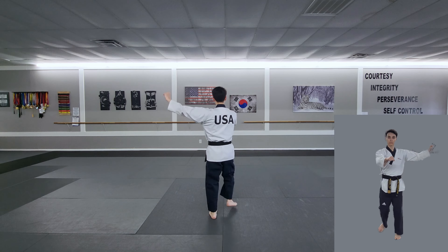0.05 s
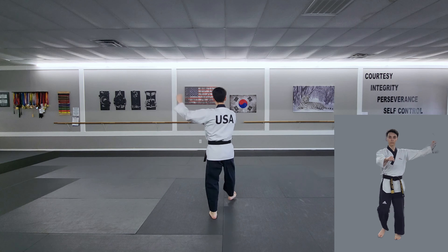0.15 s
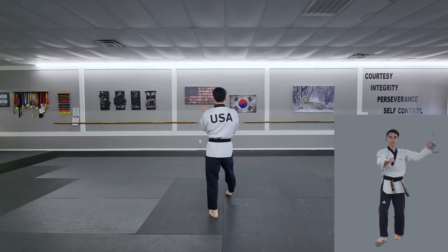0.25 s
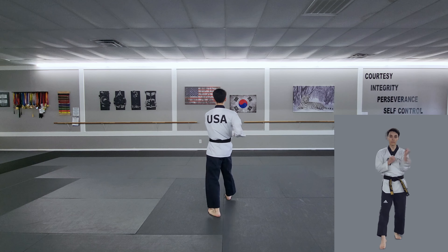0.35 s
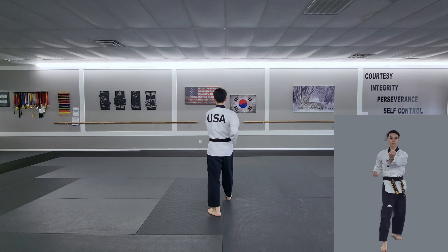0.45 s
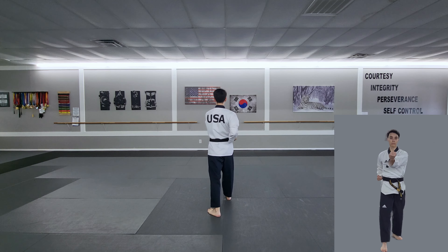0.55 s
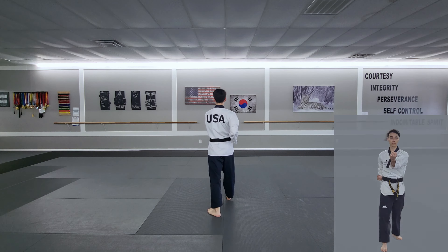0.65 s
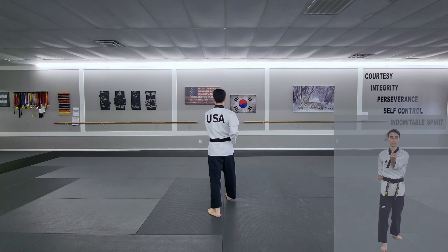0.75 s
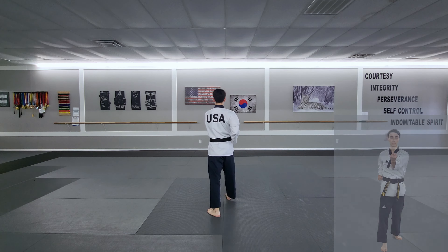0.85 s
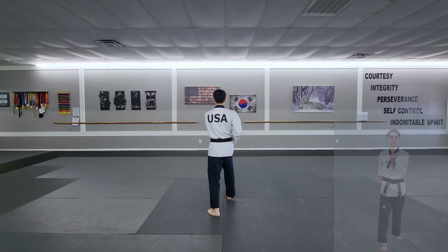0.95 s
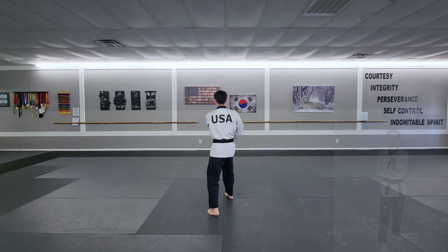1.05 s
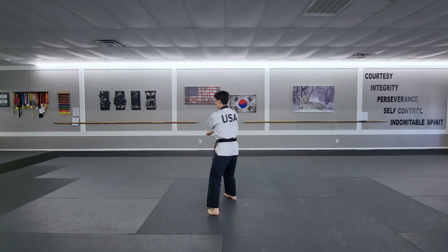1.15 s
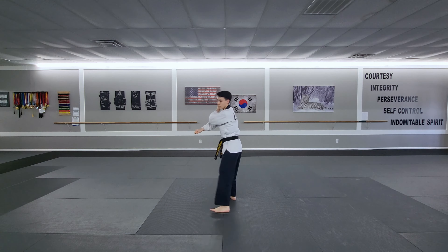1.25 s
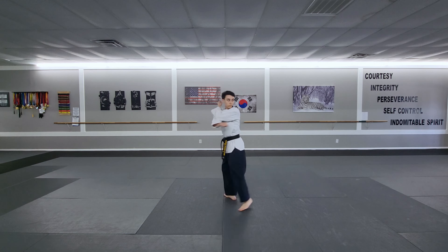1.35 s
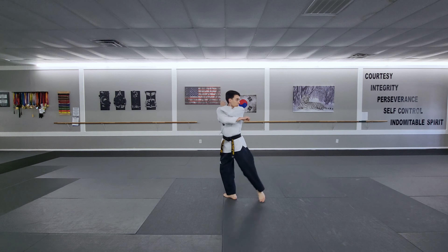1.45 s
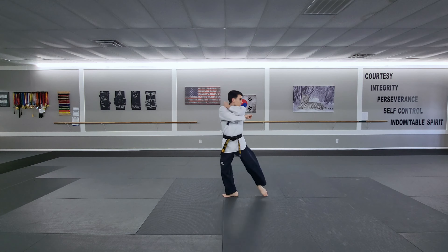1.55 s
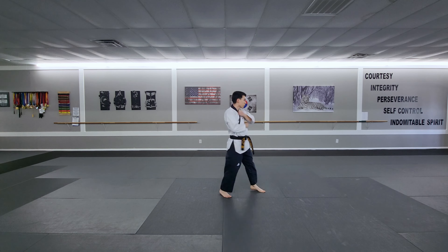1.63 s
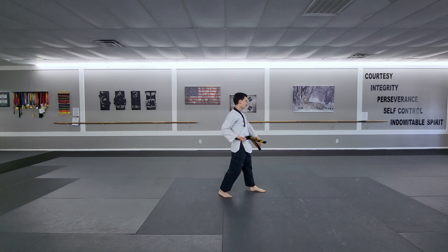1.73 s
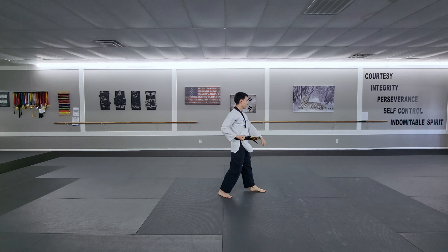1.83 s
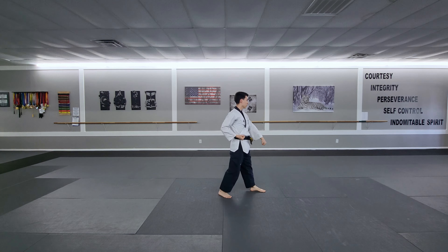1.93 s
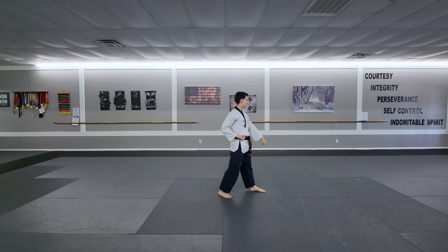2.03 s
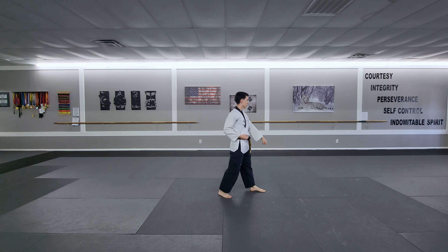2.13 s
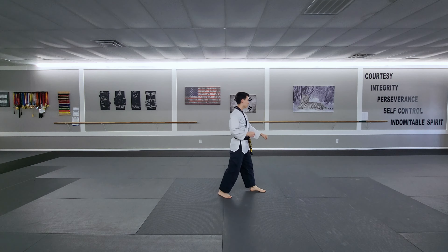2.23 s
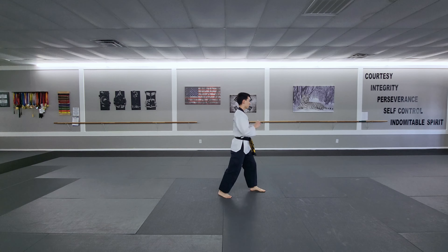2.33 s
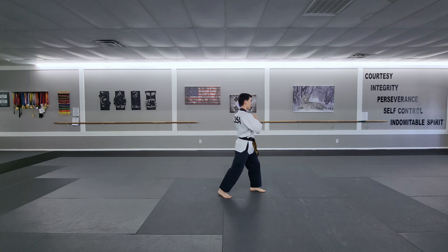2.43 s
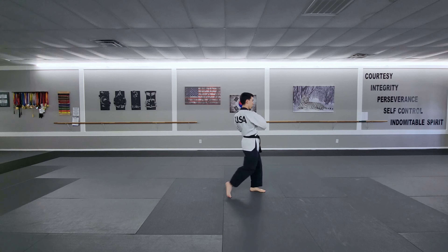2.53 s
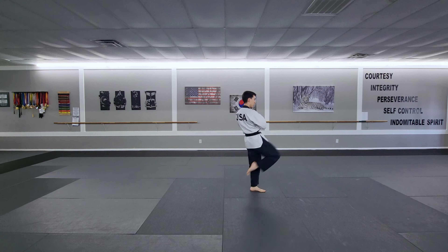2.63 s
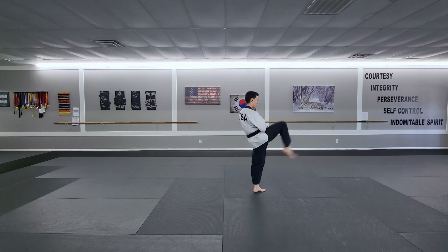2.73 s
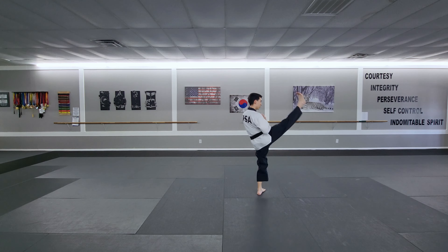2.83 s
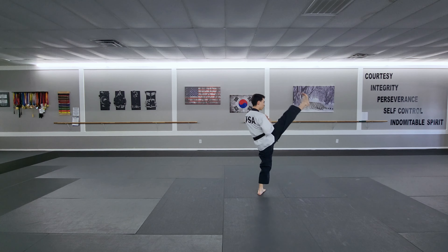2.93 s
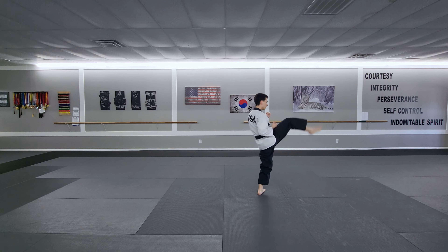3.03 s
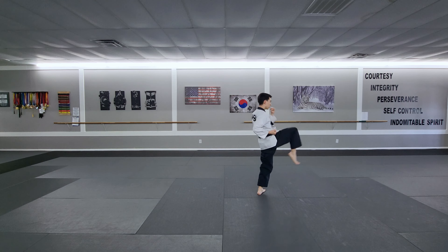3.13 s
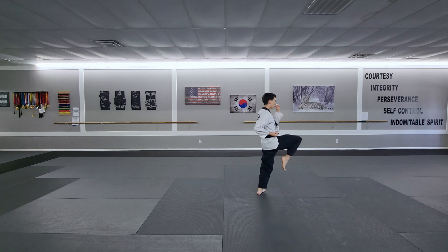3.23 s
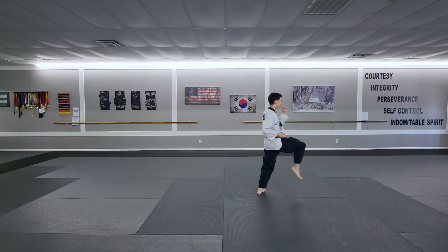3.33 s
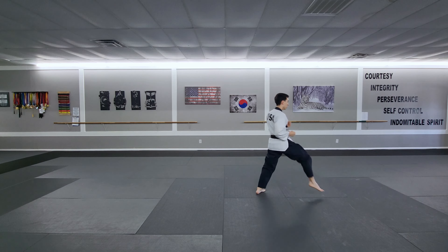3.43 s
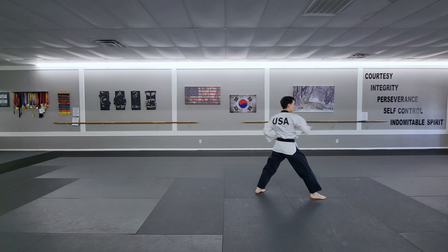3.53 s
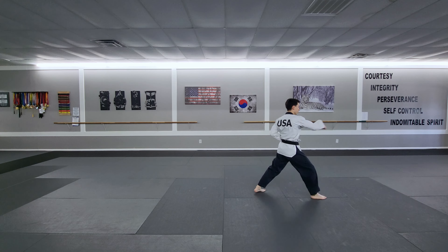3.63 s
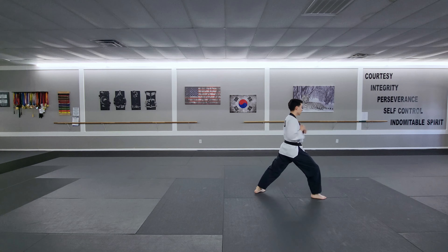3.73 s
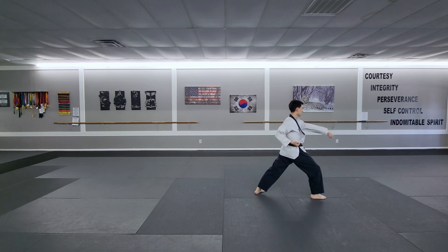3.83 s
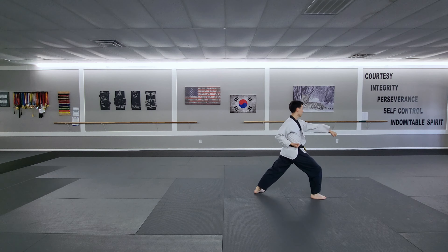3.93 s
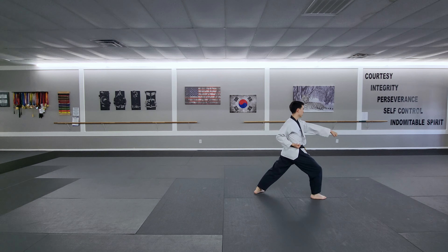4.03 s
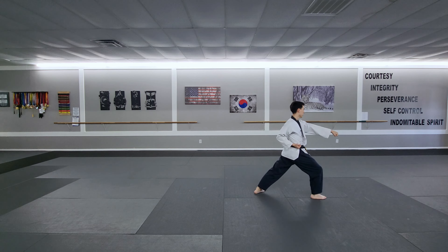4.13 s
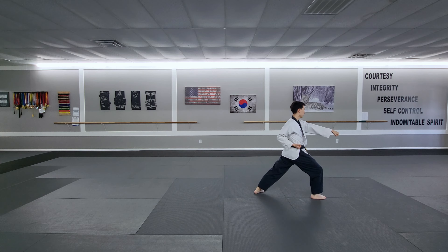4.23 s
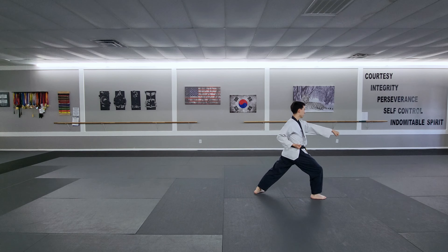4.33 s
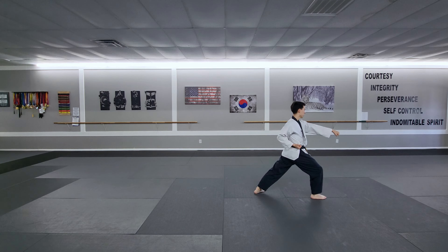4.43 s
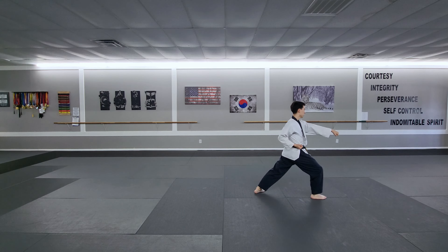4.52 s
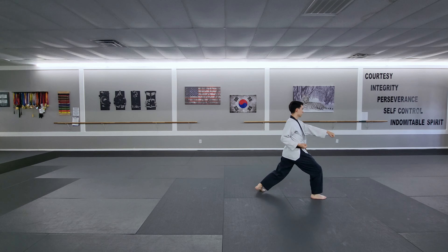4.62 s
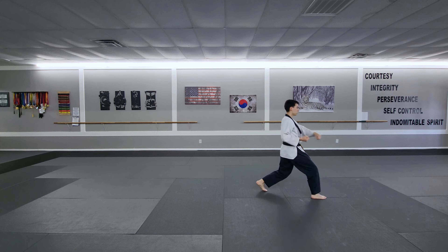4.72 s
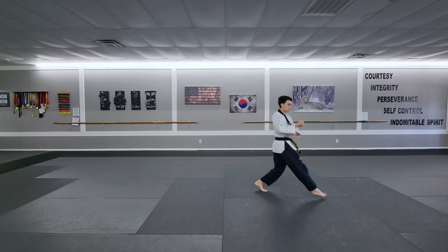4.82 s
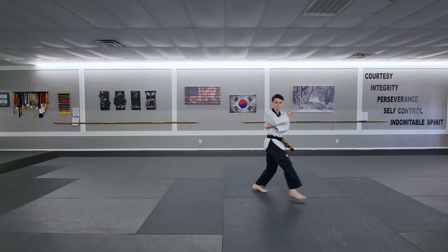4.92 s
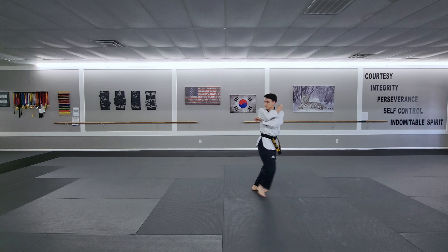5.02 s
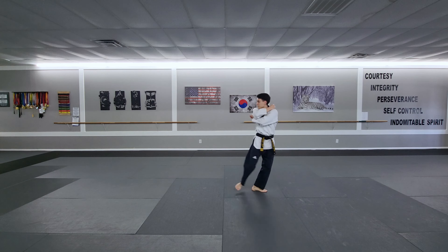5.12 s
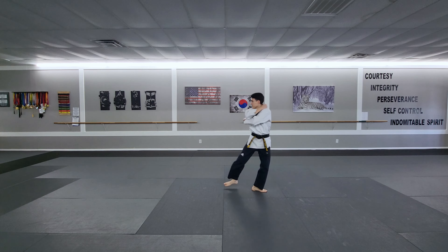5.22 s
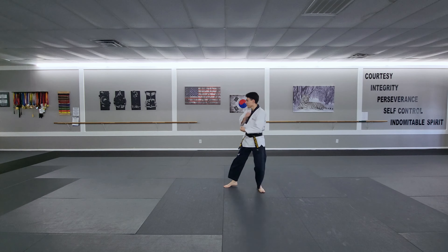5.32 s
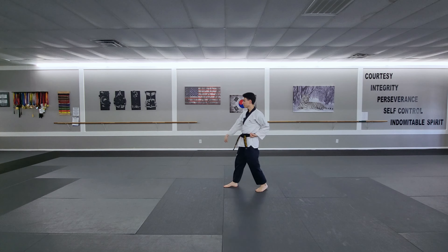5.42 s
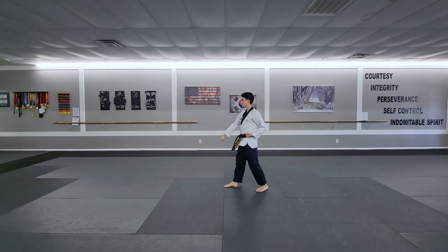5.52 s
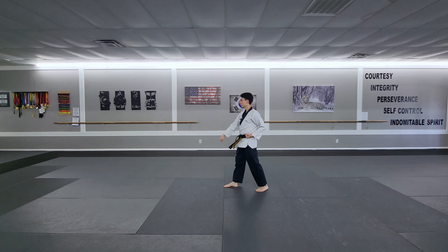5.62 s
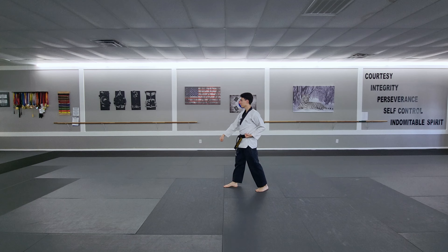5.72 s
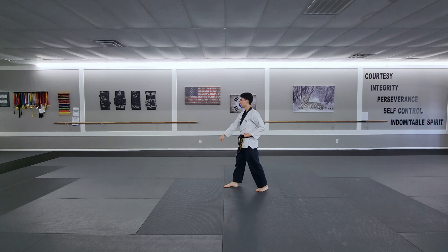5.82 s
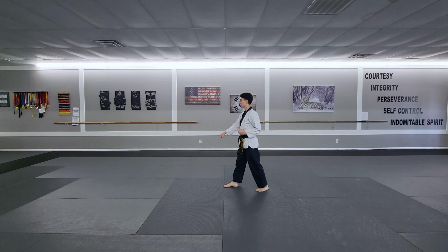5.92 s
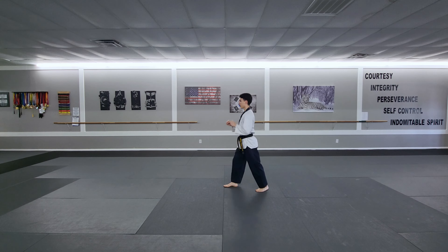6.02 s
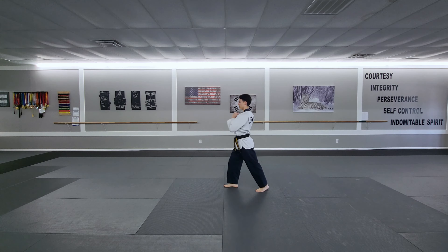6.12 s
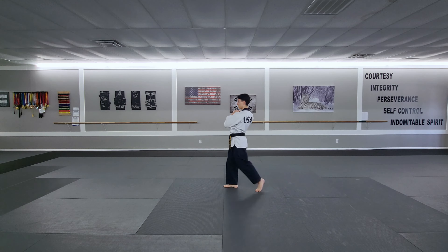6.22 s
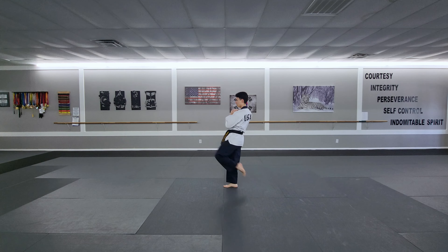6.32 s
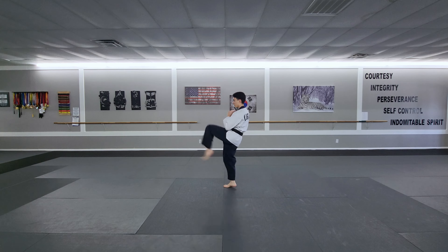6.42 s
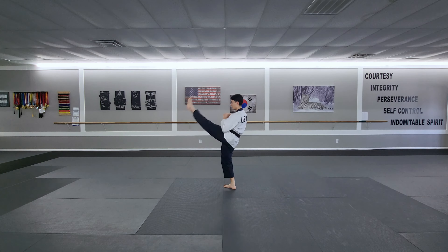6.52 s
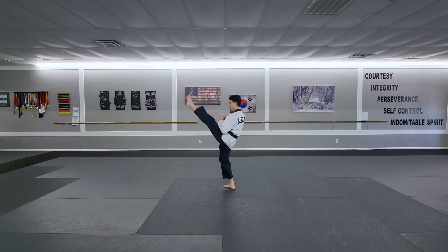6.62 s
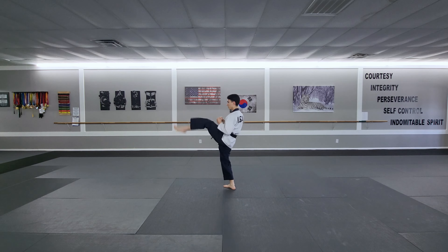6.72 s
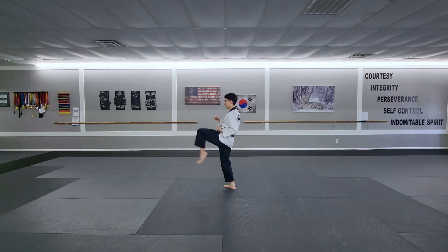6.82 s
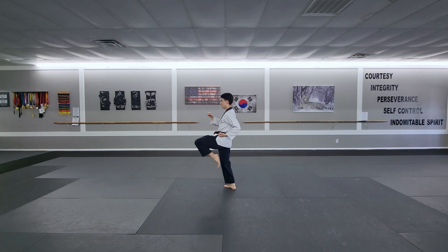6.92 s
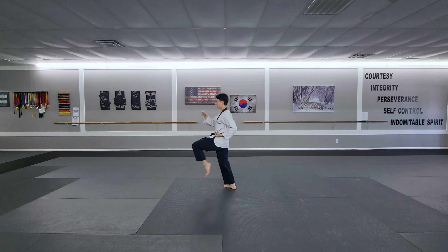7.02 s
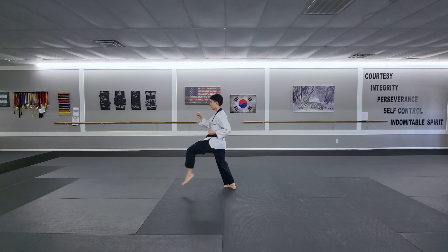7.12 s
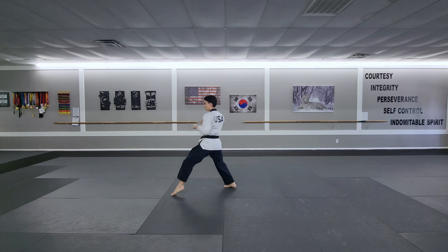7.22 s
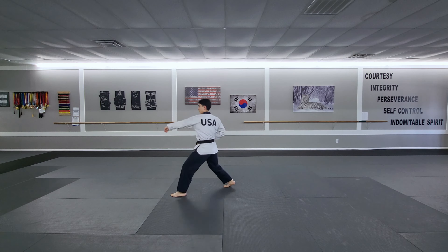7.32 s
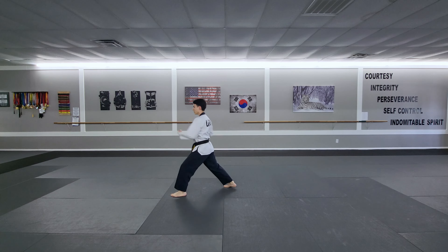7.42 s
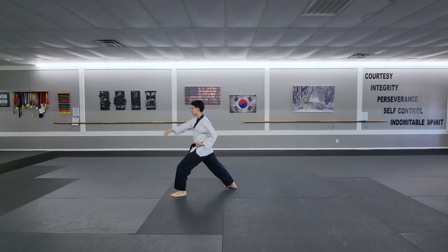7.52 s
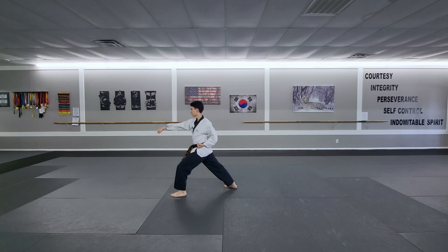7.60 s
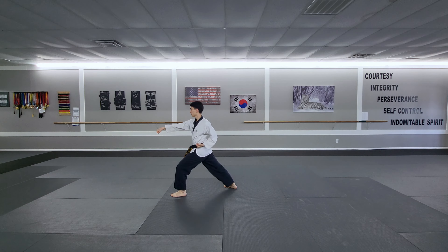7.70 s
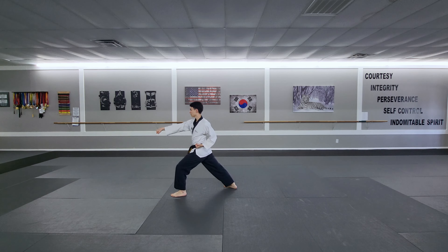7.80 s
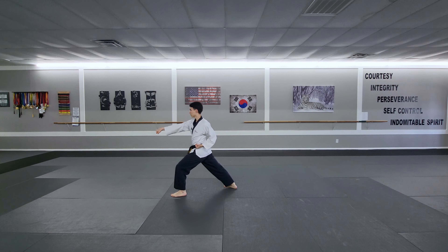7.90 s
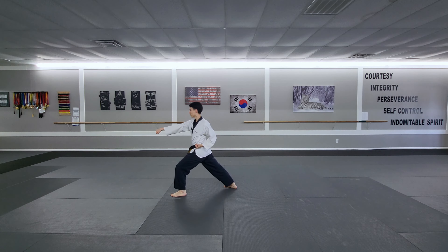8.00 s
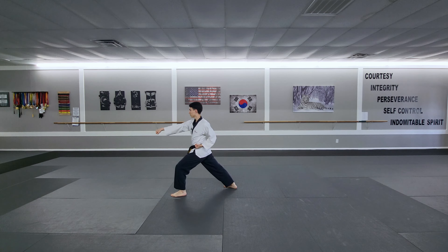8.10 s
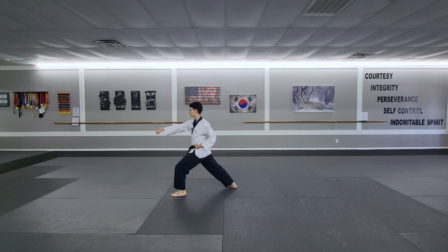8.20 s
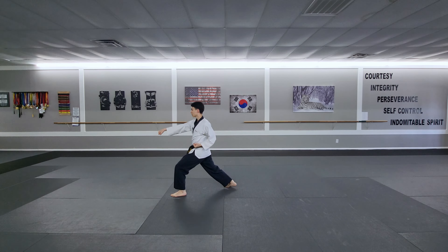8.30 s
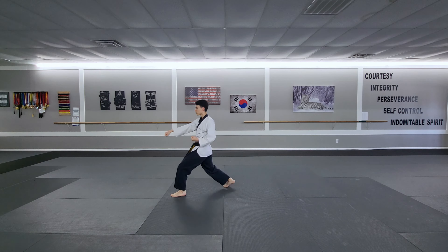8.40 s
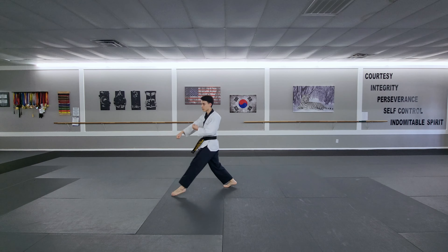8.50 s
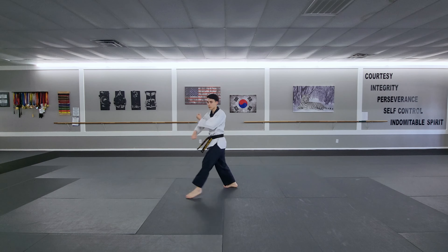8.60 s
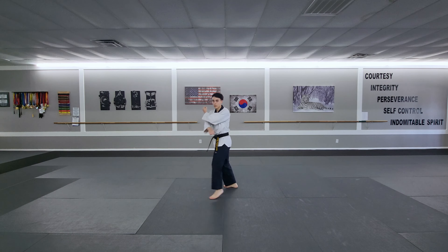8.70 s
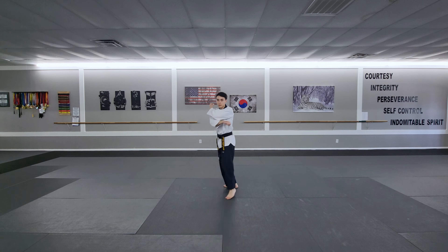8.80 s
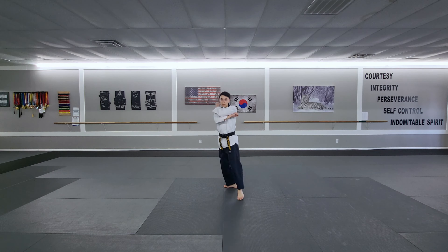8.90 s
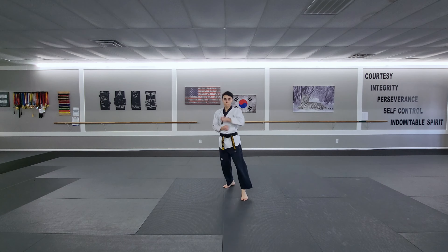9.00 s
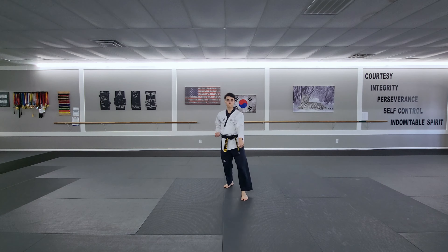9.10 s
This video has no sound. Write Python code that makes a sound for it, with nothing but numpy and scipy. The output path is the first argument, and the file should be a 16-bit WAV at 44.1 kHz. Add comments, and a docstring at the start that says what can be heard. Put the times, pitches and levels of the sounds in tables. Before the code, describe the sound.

In a low, lightly echoing training hall, a martial artist's loose uniform rustles, swishes and cracks taut with each block, kick and punch. Bare soles land in hollow pats and briefly hiss across foam mats. Two bursts of action, around a kick and landing each, are separated by quiet holds. Muffled road rumble and a climbing engine sit underneath, heard by a stereo microphone a few metres off.

```python
"""A loose uniform rustles, swishes and snaps taut as a martial artist kicks, blocks and punches in a low hall.
The cloth is made of random grains shaped by limb speed; its snaps are short noise bursts.
Bare soles pat the foam mats in filtered bursts and slide over them in filtered grains.
The hall answers with decaying diffuse noise. Traffic drones through the walls as filtered noise and
wavering sines, one engine pulls through two gears, and a thin whine and microphone hiss lie behind."""
import sys
import numpy as np
from scipy import signal
from scipy.fft import rfft, irfft, next_fast_len
from scipy.io import wavfile
from scipy.ndimage import map_coordinates

SR = 44100
rng = np.random.default_rng(int(sys.argv[2]) if len(sys.argv) > 2 else 0)


def to_wav(s):
    """Save 16-bit WAV."""
    ch = np.atleast_2d(s).T  # columns
    pcm = np.round(np.clip(ch, -1, 1) * 32767)  # PCM
    wavfile.write(sys.argv[1], SR, pcm.astype(np.int16))


N = 403515


def amp(db):
    """Decibels to gain."""
    return 10 ** (np.asarray(db) / 20)


def unit(x):
    """Scale to rms 1."""
    return x / np.sqrt(np.mean(x ** 2) + 1e-20)


def clock():
    """Time of each sample in seconds."""
    return np.arange(N) / SR


def along(points, hz):
    """Read (Hz, value) points on a log frequency axis."""
    f, v = np.transpose(points)
    return np.interp(np.log(hz + 1), np.log(f + 1), v)


def curves(rows):
    """One value per sample for each column after the time."""
    s, *cols = np.transpose(rows)
    return [np.interp(clock(), s, c) for c in cols]


def wobble(rate):
    """A smooth random curve with this many knots a second."""
    knots = rng.standard_normal(int(N * rate / SR) + 4)
    return map_coordinates(knots, [clock() * rate])


def tone(hz):
    """A sine that follows a pitch curve."""
    return np.sin(2 * np.pi * np.cumsum(hz) / SR)


def filtered(x, response):
    """Multiply the spectrum of x by a response of frequency."""
    m = next_fast_len(x.shape[-1] + SR // 4)
    spectrum = rfft(x, m) * response(np.fft.rfftfreq(m, 1 / SR))
    return irfft(spectrum, m)[..., :x.shape[-1]]


def coloured(x, spectrum, size=2048):
    """Pass x through a causal (minimum-phase) body of unit energy with this spectrum."""
    cepstrum = irfft(np.log(amp(along(spectrum, np.fft.rfftfreq(size, 1 / SR)))))
    # fold the cepstrum forward in time
    cepstrum[1:size // 2] *= 2
    cepstrum[size // 2 + 1:] = 0
    body = irfft(np.exp(rfft(cepstrum)))
    return signal.fftconvolve(x, body / np.linalg.norm(body))[:N]


def grains(rate, spread_db):
    """Tiny random impulses of uneven size, about rate of them a second, rms 1."""
    present = rng.random(N) < rate / SR
    sign = rng.choice([-1, 1], N)
    size = amp(spread_db * np.clip(rng.standard_normal(N), -2, 2))
    return unit(present * sign * size)


def blows(times, levels_db, t60, scatter, lead=.001):
    """Each blow builds up over lead seconds to one push and a dying scatter; its level is the rms over 10 ms."""
    half = SR // 8
    out, t = np.zeros(N + SR), np.arange(-half, half) / SR
    for s, db in zip(times, levels_db):
        envelope = amp(-60 * np.where(t < 0, -t / lead, t / t60))
        burst = rng.standard_normal(len(t)) * envelope
        burst *= scatter / np.linalg.norm(burst)
        burst[half] = 1  # the push itself
        burst *= np.sqrt(SR / 100) / np.linalg.norm(burst)
        out[round(s * SR):][:len(t)] += amp(db) * burst
    return out[half:][:N]


# How wide the diffuse sound is. Each row: frequency in Hz, side against mid in dB.
SIDE_WIDTH = [(60, -20.5), (280, -11), (500, -8.5), (1000, -1), (2000, -3), (4000, -1), (15000, 1)]


def diffuse(size):
    """Noise from all sides: the two close microphones share the bass but not the treble."""
    mid, side = rng.standard_normal((2, size))
    side = filtered(side, lambda hz: amp(along(SIDE_WIDTH, hz)))
    pair = np.array([mid + side, mid - side])
    return filtered(pair, lambda hz: 1 / np.hypot(1, amp(along(SIDE_WIDTH, hz))))


# Techniques that softly stir the whole uniform, most at their middle.
# Each row: start in seconds, end in seconds, relative flutter level in dB.
SOFT_MOVES = [(-.3, 0.885, -77), (0.868, 1.364, -70), (1.3, 2.24, -73), (2.11, 3.456, -66),
              (3.318, 4.054, -59), (4.476, 5.403, -70), (5.745, 7.115, -64.5), (7.069, 7.75, -59.5),
              (8.23, 9.396, -68)]
# An arm or leg sweeping through the air. Each row: time of top speed in seconds,
# half length in seconds, relative flutter level in dB, relative rub level in dB.
LIMB_SWISHES = [(0.237, 0.047, -59, -89), (0.306, 0.035, -38, -48), (1.223, .014, -52, -56.5),
                (1.52, 0.16, -54, -78), (1.71, 0.041, -45, -48.5), (1.895, 0.012, -61, -59),
                (2.677, 0.1, -51, -71.5), (2.829, 0.12, -52, -57.5), (3.072, 0.092, -61.5, -73),
                (3.582, 0.081, -49.5, -61), (3.786, 0.037, -46, -55), (4.568, 0.017, -78, -64),
                (4.819, 0.071, -69, -62), (5.349, 0.063, -45, -52), (6.031, .012, -64, -65),
                (6.113, 0.029, -58.5, -64), (6.41, 0.11, -52, -62.5), (6.76, 0.094, -64, -85),
                (7.339, 0.023, -36.5, -67), (7.486, 0.033, -42.5, -52), (8.42, 0.044, -75, -70.5),
                (8.538, 0.039, -60, -66), (9.022, 0.037, -42.5, -46.5)]
# Cloth pulled taut, flapping around the snap; the row at 6.236 s is the rear foot leaving the mat, played the
# same way. Each row: time in seconds, relative levels in dB of the crack, the crisp edge and the flap.
CLOTH_SNAPS = [(.275, -38, -49, -48), (.292, -32, -56, -40), (2.8435, -26.5, -55, -42),
               (2.869, -38, -59, -41), (3.641, -37, -54, -31), (3.857, -42, -62, -41),
               (4.372, -80, -78, -80), (4.889, -51, -73, -55), (5.46, -44, -68, -40),
               (6.236, -45, -60, -54), (6.5145, -31.5, -70, -46), (6.527, -45, -49, -44),
               (7.338, -39, -45, -41), (7.429, -41, -62, -43), (7.57, -39, -57, -35)]
# Colour of the flapping folds. Each row: frequency in Hz, relative level in dB per Hz.
FLUTTER_COLOUR = [(50, 3.5), (130, -17), (260, 3.5), (480, -5.5), (900, -6), (1250, -14), (1800, -15.5),
                  (3000, -23.5), (6000, -36.5), (16000, -72)]
# Colour of the rubbing weave, and of a snap's edge. Each row: frequency in Hz, relative level in dB per Hz.
RUB_COLOUR = [(400, -45), (1200, 7.5), (2000, 5), (3200, 6.5), (5500, 7), (8000, 2.5), (12000, -6.5),
              (16000, -10)]
MOVE_RUB_DB, MOVE_ARCH = -3.5, 1.36  # rub against flutter in soft moves; how pointed their swell is
FLAP_RISE_S, FLAP_DECAY_S, FLAP_RUB_DB = 0.0075, 0.02, -23.5  # flapping around a snap; its rub against flutter


def uniform():
    """Loose folds flap in dull little pops while the weave rubs in fine grains; both swell with limb speed."""
    t = clock()
    swells = []  # (shape, flutter dB, rub dB)
    for start, end, db in SOFT_MOVES:
        progress = np.clip((t - start) / (end - start), 0, 1)
        arch = np.abs(np.sin(np.pi * progress)) ** MOVE_ARCH
        swells.append((arch, db, db + MOVE_RUB_DB))
    for s, half, flutter_db, rub_db in LIMB_SWISHES:
        speed = np.exp2(-((t - s) / half) ** 2)
        swells.append((speed, flutter_db, rub_db))
    for s, _, _, flap_db in CLOTH_SNAPS:
        flapping = np.exp(-np.abs(t - s) / np.where(t < s, FLAP_RISE_S, FLAP_DECAY_S))
        swells.append((flapping, flap_db, flap_db + FLAP_RUB_DB))
    flutter_power = sum((amp(db) * shape) ** 2 for shape, db, _ in swells)
    rub_power = sum((amp(db) * shape) ** 2 for shape, _, db in swells)
    folds = wobble(110)  # folds catch and let go
    flutter = np.sqrt(flutter_power) * unit(amp(4.8 * folds) * grains(rate=1500, spread_db=3))
    rub = np.sqrt(rub_power) * unit(amp(3.3 * folds) * grains(rate=11000, spread_db=5.5))
    return coloured(flutter, FLUTTER_COLOUR) + coloured(rub, RUB_COLOUR)


# Dull colour of the crack of taut cloth. Each row: frequency in Hz, relative level in dB per Hz.
TAUT_COLOUR = [(50, -9.5), (130, -12.5), (270, 11.5), (460, -9), (640, -5), (950, -2), (1300, -8.5),
               (1900, -17.5), (3000, -24.5), (6000, -29.5), (16000, -64)]


def snaps():
    """A sleeve or trouser leg whips taut: a quick flurry of folds, a dull crack and a crisp edge."""
    s, crack_db, edge_db, _ = np.transpose(CLOTH_SNAPS)
    crack = blows(s, crack_db, t60=.045, scatter=1, lead=.025)
    edge = blows(s, edge_db, t60=0.048, scatter=7.4, lead=.02)
    return coloured(crack, TAUT_COLOUR) + coloured(edge, RUB_COLOUR)


# Bare feet meeting the mats. Each row: time in seconds, relative pat level in dB, relative skin slap level in dB.
FOOTFALLS = [(0.971, -54.5, -68), (1.342, -46, -72), (2.437, -70, -63), (2.553, -48, -70),
             (2.572, -56, -50), (3.516, -35.5, -44), (3.564, -37, -44), (4.779, -41, -68),
             (5.276, -41, -62), (7.238, -35, -48), (7.288, -32.5, -44), (8.217, -74, -73),
             (8.456, -52, -74), (8.517, -48, -51), (8.974, -45, -65)]
# Hollow colour of the foam. Each row: frequency in Hz, relative level in dB per Hz.
PAT_COLOUR = [(40, -29.5), (90, -6), (180, 6.5), (350, -10), (520, 11), (700, -22), (1050, -32.5),
              (1700, -21), (3000, -35.5), (16000, -34)]
# Bright colour of the slapping skin. Each row: frequency in Hz, relative level in dB per Hz.
SKIN_COLOUR = [(400, -13), (1100, 4.5), (1800, 4.5), (3200, 0.5), (5500, 3.5), (8000, -1), (12000, -14),
               (16000, -12)]
ROLL_S, ROLL_DB = .0045, -8.5  # the rest of the sole slaps down: delay and level after the first touch


def steps():
    """The foam gives a low, hollow pat; the skin adds a brief bright slap, doubled as the sole rolls down."""
    s, pat_db, slap_db = np.transpose(FOOTFALLS)
    pat = blows(s, pat_db, t60=.08, scatter=1.3, lead=.008)
    slap_times = np.r_[s, s + ROLL_S]
    slap_levels_db = np.r_[slap_db, slap_db + ROLL_DB]
    slap = blows(slap_times, slap_levels_db, t60=.012, scatter=2.5, lead=.003)
    return coloured(pat, PAT_COLOUR) + coloured(slap, SKIN_COLOUR)


# Soles dragged across the mats. Each row: start in seconds, end in seconds,
# relative level in dB, hollow share of the power from 0 to 1.
SOLE_SLIDES = [(1.355, 1.572, -48, 0.08), (1.575, 1.685, -55, 0.12), (5.287, 5.345, -55, 0.3),
               (5.367, 5.4, -50.5, 0.02), (8.649, 8.857, -60.5, .75), (8.696, 8.787, -65, 0.7),
               (8.962, 8.994, -53, 0.2)]
# Hissing colour of a sole. Each row: frequency in Hz, relative level in dB per Hz.
SOLE_COLOUR = [(150, -26), (300, -14.5), (520, 10), (1050, -21), (1700, 5.5), (2300, 1.5), (3100, 4),
               (3800, 5), (4800, 7.5), (8000, -0.5), (16000, -12.5)]
# Hollower colour, for a lightly loaded foot. Each row: frequency in Hz, relative level in dB per Hz.
HOLLOW_COLOUR = [(150, -15), (500, 15.5), (750, -19), (1080, -21), (1680, 3.5), (2050, -2), (2800, -2.5),
                 (3150, 6.5), (3600, -6.5), (7800, -5.5), (16000, -11)]


def slides():
    """A sole hisses over the textured mat, catching slightly as it goes; a lightly loaded foot sounds hollower."""
    t, ease_s = clock(), .014
    hiss, hollow = np.zeros((2, N))
    for start, end, db, share in SOLE_SLIDES:
        stroke = amp(db) * (np.tanh((t - start) / ease_s) - np.tanh((t - end) / ease_s)) / 2
        hiss += stroke * np.sqrt(1 - share)
        hollow += stroke * np.sqrt(share)
    catch = amp(2.3 * wobble(70))
    hiss *= catch * grains(rate=9000, spread_db=3)
    hollow *= catch * grains(rate=9000, spread_db=3)
    return coloured(hiss, SOLE_COLOUR) + coloured(hollow, HOLLOW_COLOUR)


# Where the performer stands. Each row: time in seconds, lag of the left microphone in samples.
PERFORMER_PLACE = [(0, 1.5), (1.5, 4), (2.8, 4), (3.6, 8.5), (4.5, 8), (5.3, 4), (6.5, 3), (7.3, -2),
                   (8.3, -2.5), (9.1, 2.5)]


def direct(x):
    """Straight sound and its ceiling bounce, reaching the nearer microphone first."""
    n = np.arange(N)
    lag, = curves(PERFORMER_PLACE)
    detour_s = .005 + 0.000472 * wobble(4)  # the bounce's delay drifts at random
    x = x + .5 * map_coordinates(x, [n - detour_s * SR])
    left = map_coordinates(x, [n - lag / 2])
    right = map_coordinates(x, [n + lag / 2])
    return np.array([left, right])


# How long the hall's tail rings. Each row: frequency in Hz, time to fall by 60 dB in seconds.
HALL_T60 = [(100, 1), (300, 0.44), (1000, 0.45), (4000, 0.52), (8000, 0.46), (15000, 0.47)]


def hall(x, size=256):
    """Early walls and a longer tail: a moving, spread-out source leaves only its dying energy in each band."""
    hz, t, z = signal.stft(x, SR, nperseg=size)
    age = t[t < 1]
    tail = amp(-60 * age / along(HALL_T60, hz)[:, None]) ** 2
    early = amp(6 - 60 * age / 0.11) ** 2
    arrival = (1 - np.exp(-age / 0.0031)) ** 2  # the first echoes take a moment to arrive
    fade = (tail + early) * arrival
    fade = fade / fade.sum(axis=1, keepdims=True)
    energy = signal.fftconvolve(np.abs(z) ** 2, fade, axes=1)[:, :len(t)]
    field = signal.stft(diffuse(N), SR, nperseg=size)[2]
    field = field / np.sqrt(np.mean(np.abs(field) ** 2))
    return signal.istft(field * np.sqrt(np.abs(energy)), SR, nperseg=size)[1][:, :N]


# Standing waves between floor and low ceiling. Each row: frequency in Hz, half width in Hz, lift in dB.
ROOM_MODES = [(240, 17, 2.5), (313, 11, 5.5), (475, 20, 3), (706, 16, 4), (960, 33, 2)]


def standing_waves(x):
    """The hall favours a few narrow bands in all that it returns of the performer."""
    def lift_db(hz):
        return sum(db / (1 + ((hz - centre) / width) ** 2) for centre, width, db in ROOM_MODES)
    return filtered(x, lambda hz: amp(lift_db(hz)))


# Colour of the road's rumble. Each row: frequency in Hz, relative level in dB per Hz.
RUMBLE_COLOUR = [(15, -34.5), (28, -16.5), (38, -20), (50, 2.5), (64, -0.5), (78, 4.5), (96, -11.5),
                 (115, -9.5), (150, -22.5), (215, -27), (245, -25.5), (330, -36.5), (450, -53.5),
                 (1000, -79.5), (4000, -100)]
# Swells of the deep hum. Each row: time of its height in seconds, half length in seconds, relative level in dB.
DEEP_SWELLS = [(2.273, 0.083, -47), (5.205, 0.23, -47), (7.388, 0.37, -44)]
RUMBLE_DB, RECEDE_DB_PER_S = -44, 0.59  # rumble at the start; how fast it thins out
BOOM_HZ, BOOM_DB = 76.6, -53.5
HUM_HZ, HUM_DB = 50.4, -60  # middle pitch; level between the swells


def traffic():
    """Only the road's bass gets in: a fading rumble, a wavering boom, a deep hum and one engine."""
    t = clock()
    rumble_gain = amp(RUMBLE_DB - RECEDE_DB_PER_S * t + 2.16 * wobble(5))
    rumble = rumble_gain * unit(filtered(diffuse(N), lambda hz: amp(along(RUMBLE_COLOUR, hz))))
    boom = amp(BOOM_DB) * unit(amp(wobble(6.1)) * tone(BOOM_HZ + wobble(16)))
    swells = sum(amp(db) * np.exp2(-((t - s) / half) ** 2) for s, half, db in DEEP_SWELLS)
    hum = (amp(HUM_DB) + swells) * unit(amp(0.86 * wobble(6)) * tone(HUM_HZ + 0.78 * wobble(11)))
    return rumble + boom + hum + engine()


# An engine outside pulls through two gears. Each row: start in seconds, end in seconds,
# first pitch in Hz, last pitch in Hz, relative level in dB.
ENGINE_GEARS = [(-.05, 2.1, 102, 135.4, -51), (2.778, 5.5, 115.4, 133.5, -46)]
# Engine tones that swell on crossing a resonance of the hall. Each row: share of the engine pitch,
# resonance in Hz, half width in Hz, relative level in dB.
RESONANT_TONES = [(.62, 78.3, 2.14, 2.5), (1, 117.6, 2.65, 0)]
CLIMB_BEND, CLUTCH_S = .85, 0.059  # under 1 the climb slows towards the end of a gear; time to take up the load


def engine():
    """In each gear the pitch climbs; the hall picks out each tone as it passes a resonance."""
    t, out = clock(), np.zeros(N)
    for start, end, first_hz, last_hz, db in ENGINE_GEARS:
        climb = np.clip((t - start) / (end - start), 0, 1) ** CLIMB_BEND
        hz = first_hz + (last_hz - first_hz) * climb
        load = (np.tanh((t - start) / CLUTCH_S) - np.tanh((t - end) / CLUTCH_S)) / 2
        for share, centre_hz, width_hz, tone_db in RESONANT_TONES:
            resonance = 1 / np.hypot(1, (share * hz - centre_hz) / width_hz)
            voice = unit(amp(2.0 * wobble(8.6)) * tone(share * (hz + wobble(14))))
            out += amp(db + tone_db) * load * resonance * voice
    return out


# A faint thin whine comes and goes. Each row: start in seconds, end in seconds, relative level in dB.
THIN_WHINES = [(2.34, 2.79, -83), (5.147, 5.557, -82)]


def whine(rest_hz=12300, top_hz=13350):
    """The thin whine flickers, climbing in pitch as it swells and sinking back as it fades."""
    t, out = clock(), np.zeros(N)
    for start, end, db in THIN_WHINES:
        progress = np.clip((t - start) / (end - start), 0, 1)
        swell = np.sqrt(np.abs(np.sin(np.pi * progress)))
        hz = rest_hz + (top_hz - rest_hz) * swell + 90 * wobble(60)
        out += amp(db + 5 * wobble(30)) * swell * tone(hz)
    return out


# Colour of the microphone noise. Each row: frequency in Hz, relative level in dB per Hz.
HISS_COLOUR = [(100, 15.5), (500, -1), (1000, -4.5), (3000, -8), (8000, -8.5), (16000, -14)]


def microphone_hiss():
    """Faint steady microphone noise, made of coloured diffuse noise."""
    return amp(-78.5) * unit(filtered(diffuse(N), lambda hz: amp(along(HISS_COLOUR, hz))))


def scene():
    """The performer, straight and through the hall, over traffic, a thin whine and a faint hiss."""
    rubbing = uniform() + slides()
    hits = snaps() + steps()
    # the hall's share is the same for rubbing and hits; the rubbing gets 1 dB more gain in both
    near = direct(amp(-5.0) * rubbing + amp(-6.0) * hits)
    far = standing_waves(hall(amp(-1.5) * rubbing + amp(-2.5) * hits))
    return near + far + traffic() + whine() + microphone_hiss()


# Treble peaks of the microphones. Each row: frequency in Hz, gain in dB.
MIC_RESPONSE = [(20, 0), (6500, 3.5), (7800, 8.5), (9000, 4), (16000, 9)]
# How the two microphones differ. Each row: frequency in Hz, left minus right in dB.
MIC_BALANCE = [(60, -1.5), (250, -0.9), (500, -2), (1800, -2.5), (4000, 0.3), (14000, 3)]
TOP_HZ = 15850  # nothing passes this band limit


def record(dry):
    """The microphones peak in the treble and differ a little; a sharp cut limits the band."""
    sides = np.array([[.5], [-.5]])  # left and right take half the difference each

    def response(hz):
        return amp(along(MIC_RESPONSE, hz) + sides * along(MIC_BALANCE, hz)) * (hz < TOP_HZ)
    return filtered(dry, response)


dry = scene()
out = record(dry)
to_wav(out)
```